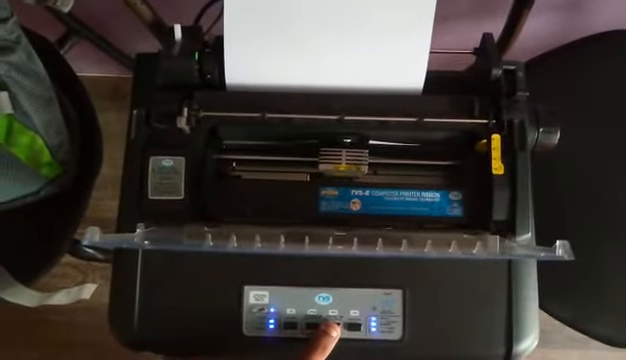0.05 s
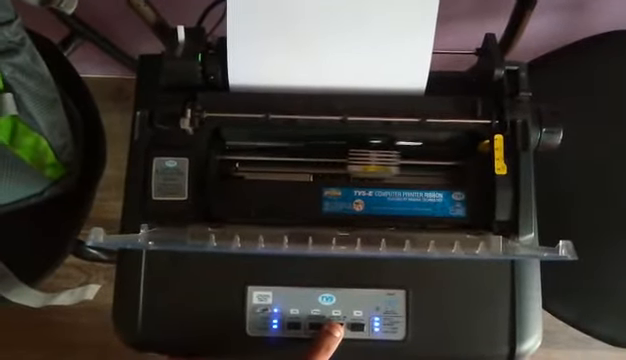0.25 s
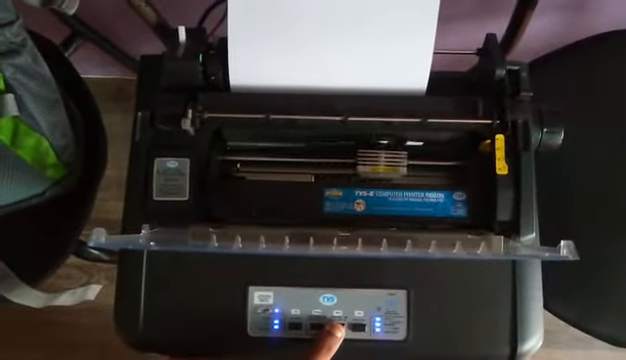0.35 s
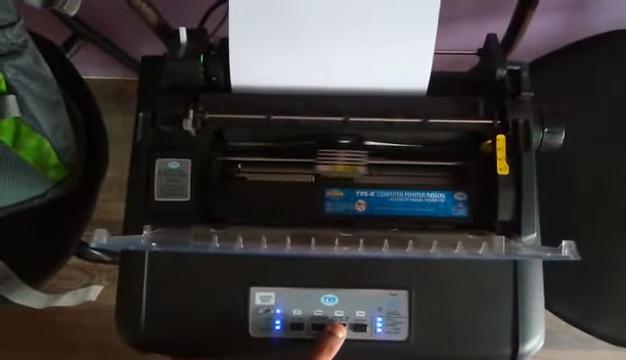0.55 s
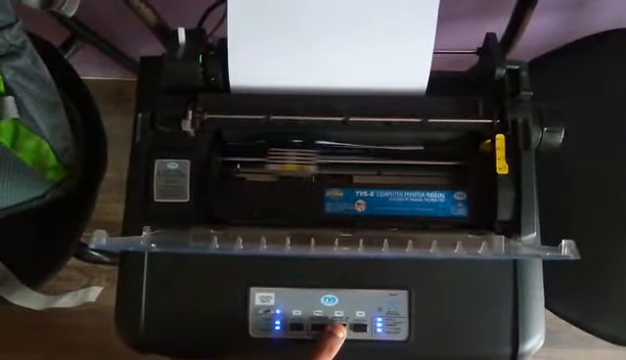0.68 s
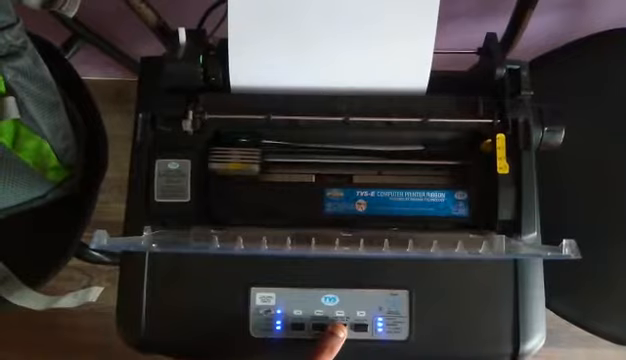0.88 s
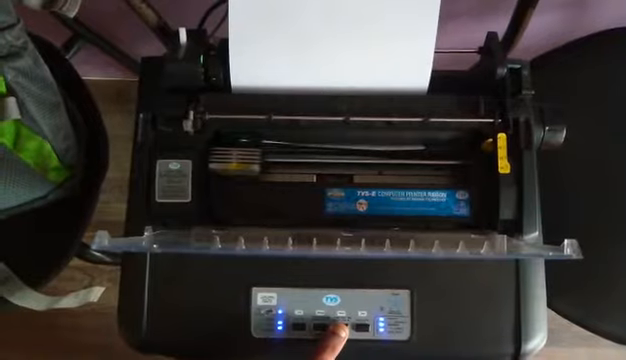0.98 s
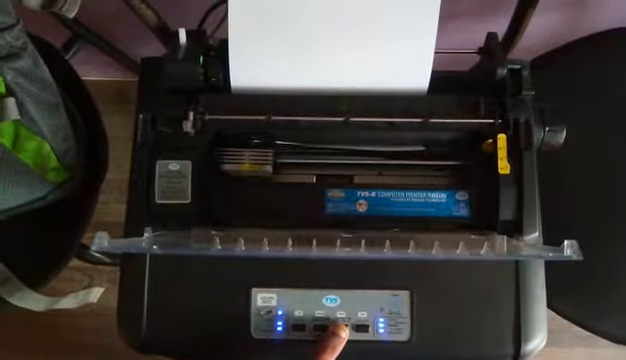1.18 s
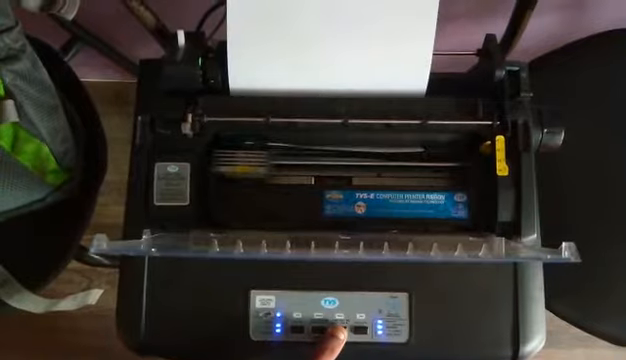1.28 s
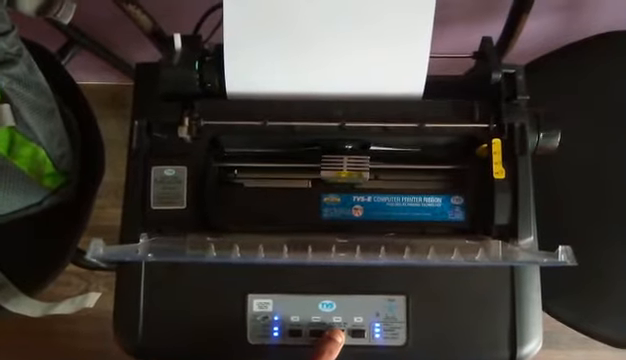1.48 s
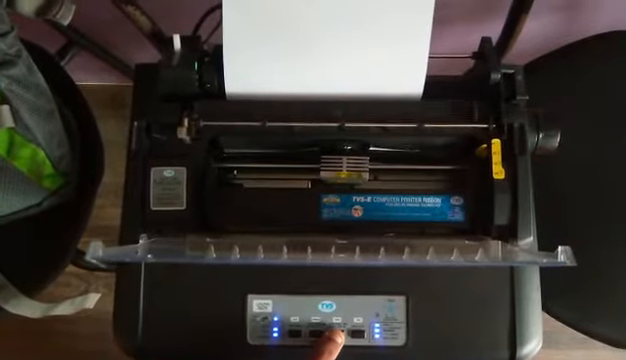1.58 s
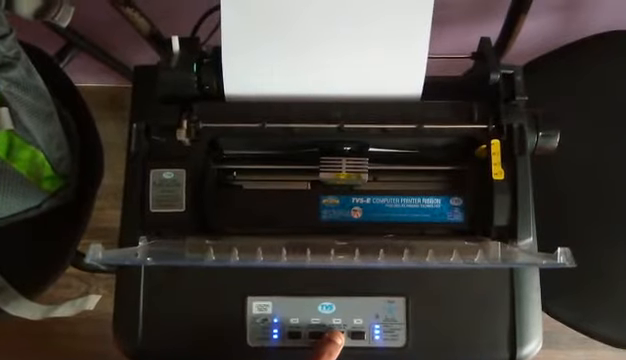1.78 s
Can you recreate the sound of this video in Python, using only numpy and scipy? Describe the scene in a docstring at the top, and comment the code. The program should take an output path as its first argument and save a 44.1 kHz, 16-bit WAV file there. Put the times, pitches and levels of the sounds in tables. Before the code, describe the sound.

Dot matrix printer carriage whining and rattling in quick bursts, knocking at starts and stops.

```python
"""A small quiet room: a dot matrix printer, heard from just above, homes its carriage.
A stepper motor makes four runs. It whines at its step rate and shakes the casing while speeding up
and braking; the carriage hisses along its rail. The frame hums in the first run, the drive squeals
in the last. Slack parts knock at starts and stops, a catch ticks, a soft shuffle ends it."""
import sys
import numpy as np
from scipy import signal
from scipy.fft import rfft, irfft
from scipy.io import wavfile

SR = 44100
rng = np.random.default_rng(int(sys.argv[2]) if len(sys.argv) > 2 else 0)


def persist_wave(psi):
    """Save psi, clipped to +-1, as 16-bit WAV."""
    counts = np.round(np.clip(psi, -1, 1) * 32767).astype(np.int16)
    wavfile.write(sys.argv[1], SR, np.atleast_2d(counts).T)


N = 81585

# Spectrum of shaking parts. Each row: frequency in Hz, level in dB.
JUDDER_SPECTRUM = [(200, -16.5), (500, -4), (850, -13), (1300, 1), (2000, -1.5), (2600, -4.5), (3400, -0.5),
                   (6200, -10.5), (10500, -1), (12000, -48), (15000, -95)]


def undb(db):
    return 10 ** (np.asarray(db) / 20)


def clock():
    return np.arange(N) / SR


def unit(x):
    return x / np.sqrt(np.mean(x ** 2) + 1e-18)


def shape(x, points, tilt_db=0):
    """Filter by (Hz, dB) points and a tilt per octave about 5 kHz, held below 625 Hz."""
    hz, db = np.array(points, float).T
    log_hz = np.log2(np.maximum(np.fft.rfftfreq(2 * N, 1 / SR), 1))
    octaves = np.maximum(log_hz - np.log2(5000), -3)
    gain = undb(np.interp(log_hz, np.log2(hz), db) + tilt_db * octaves)
    return irfft(rfft(x, 2 * N) * gain)[..., :N]


def walk(rate_hz):
    """Smooth random curve, unit RMS."""
    points = rng.standard_normal(N // 8)
    return unit(np.interp(clock() * rate_hz, np.arange(len(points)), points))


def noise(spectrum, tilt_db=0, grain=0):
    """Coloured stereo noise, unit RMS; grain makes it a mass of uneven tiny contacts."""
    contact_size = np.exp(grain * walk(1500))
    return unit(shape(rng.standard_normal((2, N)) * contact_size, spectrum, tilt_db))


def gate(start_s, stop_s, edge_s):
    """On from start to stop, with linear edges."""
    t = clock()
    return np.clip(np.minimum(t - start_s, stop_s - t) / edge_s, 0, 1)


def convolve(x, response):
    return signal.fftconvolve(x, response, axes=-1)[:, :N]


def spread(x, width):
    """Filter side against mid: the microphone pair hears diffuse bass in opposite phase."""
    mid = (x[0] + x[1]) / 2
    side = shape((x[0] - x[1]) / 2, width)
    return np.array([mid + side, mid - side])


def air():
    """Quiet, steady room noise, wide in the bass."""
    # Each row: frequency in Hz, level in dB.
    spectrum = [(15, -72), (25, -27), (86, -6), (128, -7), (224, -17.5), (309, -5.5), (415, -15),
                (515, -7.5), (637, -11), (749, -5), (927, -11.5), (1060, -15), (1180, -11.5), (1280, -12.5),
                (1720, -14.5), (2180, -21), (2430, -22.5), (3090, -25), (5010, -33.5), (6370, -34),
                (7890, -37), (10300, -14.5), (15000, -60)]
    # Each row: frequency in Hz, side gain in dB.
    width = [(30, 9), (80, 12), (160, 15.5), (310, 11.5), (450, 10.5), (750, 1.5), (1300, -4.5),
             (2500, -0.5), (5000, 1), (15000, -0.5)]
    return spread(undb(-48) * noise(spectrum), width)


def room(x):
    """Dense reflections of a small room; the treble dies first."""
    low_t60_s, treble_t60_s, onset_s = 0.51, 0.3, 0.004
    t = clock()
    wash = rng.standard_normal((2, N))
    low = signal.sosfilt(signal.butter(2, 2500, fs=SR, output="sos"), wash)
    tail = low * undb(-60 * t / low_t60_s) + (wash - low) * undb(-60 * t / treble_t60_s)
    response = unit(tail * np.minimum(t / onset_s, 1)) / np.sqrt(N)
    return undb(-8) * convolve(x, response)


def casing(x):
    """Casing modes rung by x, each reaching the two ears in its own phase."""
    # Each row: frequency in Hz, level in dB, T60 in seconds.
    modes = [(533, -2, .25), (705, -3, .2), (1058, -2, .2), (1200, 0, .25), (1376, -2, .2), (1610, -7, .1),
             (2090, -9, .1), (9443, -9, .12), (9980, -10, .12), (10142, -8, .12), (10522, -10, .12),
             (10664, -10, .12)]
    t = clock()
    response = sum(undb(db - 60 * t / t60_s) * np.sin(2 * np.pi * (hz * t + rng.random((2, 1))))
                   for hz, db, t60_s in modes)
    return undb(-51) * convolve(x, response)


def frame_hum():
    """A low frame mode during the first run, in near opposite phase at the ears."""
    # Each row: time in seconds, level in dB.
    contour = [(.215, -62), (.25, -42.5), (.315, -35), (.39, -47), (.48, -43.5), (.53, -59)]
    times_s, db = np.array(contour).T
    mode_hz, ear_phase_rad = 106.4, np.array([[2.6], [0]])
    cycles = np.cumsum(mode_hz * (1 + 0.018 * walk(49.5))) / SR
    envelope = gate(times_s[0], times_s[-1], 0.01) * undb(np.interp(clock(), times_s, db))
    return envelope * np.sqrt(2) * np.sin(2 * np.pi * cycles + ear_phase_rad)


def shuffle():
    """The mechanism settles with a short, soft scrape."""
    # Each row: frequency in Hz, level in dB.
    spectrum = [(250, -20), (600, -7), (1400, 2), (3100, 3.5), (4500, -4.5), (6500, -8.5), (8500, -3),
                (10400, 5.5), (12000, -12), (15000, -20)]
    return undb(-42) * gate(1.672, 1.722, edge_s=0.0091) * noise(spectrum, grain=0.15)


def chatter():
    """Slack parts tremble on briefly after a stop."""
    # Each row: start in seconds, level in dB, decay in seconds.
    bursts = [(0.37, -43, 0.052), (1.191, -44, 0.014), (1.564, -32, 0.027)]
    envelope = 0
    for start_s, db, decay_s in bursts:
        age_s = np.maximum(clock() - start_s, 0)
        envelope += undb(db) * gate(start_s, N / SR, 0.016) * np.exp(-age_s / decay_s)
    return envelope * undb(0.84 * walk(120)) * noise(JUDDER_SPECTRUM, tilt_db=-2.5, grain=0.35)


def catch():
    """A small metal part pings once as the carriage leaves its end stop."""
    # Each row: frequency in Hz, level in dB, T60 in seconds.
    modes = [(5130, -4, 0.016), (5490, 0, 0.018), (6700, -28, 0.027), (9900, -7, .015), (10720, 3, 0.014)]
    start_s, rise_s, ear_phase_rad = 1.0948, 0.0016, np.array([[0], [np.pi / 2]])
    age_s = np.maximum(clock() - start_s, 0)
    ping = sum(undb(db - 60 * age_s / t60_s) * np.sin(2 * np.pi * hz * age_s + ear_phase_rad)
               for hz, db, t60_s in modes)
    return undb(-17.5) * np.minimum(age_s / rise_s, 1) * ping


def squeal():
    """The drive squeals, wavering, at top speed in the fastest run."""
    # Each row: time in seconds, pitch in Hz, level in dB.
    contour = [(1.42, 3330, -55), (1.436, 3350, -36), (1.452, 3475, -39), (1.468, 3426, -36.5),
               (1.478, 3390, -37), (1.49, 3420, -39), (1.5, 3390, -57)]
    times_s, hz, db = np.array(contour).T
    t = clock()
    ear_phase_rad = np.array([[0], [1.2]])
    cycles = np.cumsum(np.interp(t, times_s, hz) * (1 + 0.0059 * walk(270))) / SR
    envelope = gate(times_s[0], times_s[-1], 0.004) * undb(np.interp(t, times_s, db))
    return envelope * np.sin(2 * np.pi * cycles + ear_phase_rad)


def knocks():
    """Slack parts knock: tight clusters of contacts, too light to give bass."""
    # Each row: start in seconds, level in dB, decay in seconds, tilt in dB per octave.
    hits = [(0.2087, -29, 0.0048, -2), (0.4764, -21.5, 0.0098, -2.5), (0.4828, -29, 0.0074, -5.5),
            (0.491, -37, .003, -21), (0.5223, -22.5, 0.007, -1.5), (0.9486, -26, 0.0066, -3),
            (0.984, -33.5, 0.0058, -7), (0.991, -25, 0.011, -2), (1.0962, -33, 0.003, -1.5),
            (1.185, -32.5, 0.0057, -5), (1.292, -31.5, 0.012, -6), (1.2963, -24.5, 0.0058, -2.5),
            (1.3084, -18, 0.0025, -1), (1.33, -21, 0.0033, 1), (1.3422, -19.5, 0.0066, -2.5),
            (1.35, -12.5, 0.005, -2), (1.3654, -27, 0.0083, -6.5), (1.369, -17, 0.0042, -0.5),
            (1.485, -27, .004, 14), (1.5183, -20.5, 0.006, -2), (1.5499, -18, 0.0063, 0)]
    # Each row: frequency in Hz, level in dB.
    spectrum = [(120, -21), (220, -16), (330, -19.5), (550, -4), (900, -4.5), (1350, 2.5), (1700, 1.5),
                (2150, 0), (2650, 1), (3400, 3.5), (5200, 5.5), (6200, 2.5), (8200, 4), (9400, 7.5),
                (10600, 12.5), (11800, -2), (15000, -13)]
    rise_s = 0.0015
    out = 0
    for start_s, db, decay_s, tilt_db in hits:
        age_s = np.maximum(clock() - start_s, 0)
        envelope = np.minimum(age_s / rise_s, 1) * np.exp(-np.maximum(age_s - rise_s, 0) / decay_s)
        out += undb(db) * envelope * noise(spectrum, tilt_db)
    return signal.sosfilt(signal.butter(4, 310, "high", fs=SR, output="sos"), out)


def stepper_whine(steps, harmonics_db):
    """Multiples of the step rate, each with a slow waver and a fast flutter."""
    out = 0
    for k, db in enumerate(harmonics_db, 1):
        waver_db = 2.15 * np.array([walk(24.8), walk(25.84)])
        flutter = 1 + 0.035 * k * walk(200)
        out += undb(db + waver_db) * flutter * np.sqrt(2) * np.sin(2 * np.pi * k * steps)
    return out


def stepper_growl(steps, ramp, running):
    """Rough tone of the slow, uneven steps in the lower 45% of a ramp."""
    envelope = running * np.sqrt(np.clip((0.45 - ramp) * 3, 0, 1)) * undb(1.5 * walk(200))
    tone = np.sin(2 * np.pi * steps) + 1.7 * np.sin(4 * np.pi * steps)
    return undb(-47) * shape(envelope * tone, [(500, 3.5), (1100, -10), (1700, -25), (2600, -14)])


def carriage():
    """Runs ramp up, cruise and brake: whine and rail hiss grow with speed, judder fades."""
    # Each row: start, stop, speed-up and braking in seconds, step rate in Hz, pull-in share of that
    # rate, hiss in dB, hiss tilt in dB per octave, belt roll, judder and rumble in dB,
    # whine swell in dB per second, lag between ears in ms.
    runs = [(0.209, 0.378, .036, .048, 903.6, 0.7, -39.5, -0.5, -46, -37, -55, -5, 0.09),
            (.477, 1.01, .06, .055, 1086, .8, -39, 3, -48, -34, -63, 5, 0.067),
            (1.106, 1.191, 0.037, .04, 811.6, 0.76, -42.5, -5.5, -44, -36, -51, 7, 0.07),
            (1.291, 1.557, .10, .043, 2694, .4, -32.5, 0, -50, -33.5, -49, -40, -0.078)]
    # Each row: one run's levels of step-rate multiples 1 to 6 in dB.
    whine_db = [(-52.5, -36, -53.5, -45, -76, -58), (-42.5, -44.5, -57.5, -50, -66, -72),
                (-66, -45.5, -71, -56, -60, -75), (-43, -68, -68, -77, -79, -92)]
    # Three spectra. Each row: frequency in Hz, level in dB.
    rail_spectrum = [(1200, -25.5), (2700, -16), (3200, -6), (3750, -7.5), (4500, -6), (5200, -6.5),
                     (6100, -12.5), (8000, -6), (9400, -1.5), (10100, 2.5), (10700, 4.5), (11300, -9.5),
                     (12200, -16), (13300, -30), (15000, -38)]
    belt_spectrum = [(120, -4), (220, -14), (320, -21), (550, -25), (800, 1.5), (1300, 7), (1750, -0.5),
                     (2100, 4), (2700, -5), (5000, -8)]
    rumble_spectrum = [(30, -31), (60, -1), (85, 9.5), (106, 21), (135, -12.5), (220, -16), (320, -15.5),
                       (600, -74)]
    ramp_ease, whine_floor, hiss_floor = 1.7, 0.083, 0.17
    t = clock()
    motor = clatter = rumble = 0
    for run, harmonics_db in zip(runs, whine_db):
        (start_s, stop_s, speed_up_s, brake_s, step_hz, pull_in,
         hiss_db, tilt_db, roll_db, judder_db, rumble_db, swell_db_per_s, lag_ms) = run
        running = gate(start_s, stop_s, 0.0025)
        ramp = np.clip(np.minimum((t - start_s) / speed_up_s, (stop_s - t) / brake_s), 0, 1)
        speed = 1 - (1 - pull_in) * (1 - ramp) ** ramp_ease
        hunting = (0.003 + 0.09 * (1 - ramp)) * walk(260)  # rotor speed scatter
        steps = np.cumsum(step_hz * speed * (1 + hunting)) / SR
        ear_steps = steps - step_hz * lag_ms / 1000 * np.array([[0], [1]])

        swell = undb(swell_db_per_s * (t - (start_s + stop_s) / 2))
        whine_gain = running * (whine_floor + (1 - whine_floor) * ramp) * swell
        motor += whine_gain * stepper_whine(ear_steps, harmonics_db)
        motor += stepper_growl(ear_steps, ramp, running)

        hiss_gain = undb(hiss_db + 0.9 * walk(39.9)) * (hiss_floor + (1 - hiss_floor) * ramp)
        hiss = hiss_gain * noise(rail_spectrum, tilt_db, grain=0.18)
        judder = undb(judder_db) * (1 - ramp ** 2.57) * noise(JUDDER_SPECTRUM, grain=0.22)
        roll = undb(roll_db) * noise(belt_spectrum)
        step_pulse = 1 + 0.19 * np.cos(2 * np.pi * steps)
        clatter += running * step_pulse * (hiss + judder + roll)
        rumble += undb(rumble_db) * gate(start_s, stop_s + 0.093, 0.15) * noise(rumble_spectrum)
    return motor, clatter, rumble


def scene():
    """The mechanism rings the casing and the room, over quiet air."""
    # Each row: frequency in Hz, side gain in dB.
    width = [(30, -13), (80, 3), (160, 22.5), (230, 26.5), (400, 11), (750, 10.5), (1300, 0.5), (2200, 2),
             (4000, -1.5), (15000, 0.5)]
    motor, clatter, rumble = carriage()
    body = clatter + knocks() + chatter() + shuffle()
    body += casing(body)
    tones = motor + squeal()
    tick = catch()
    background = air() + frame_hum()
    reflections = room(body + 0.75 * tick + 0.22 * tones)
    return background + tones + tick + spread(body + rumble + reflections, width)


def record(dry):
    """Two microphones, each slightly coloured; the top is cut."""
    # Each row: frequency in Hz, left over right in dB.
    balance = [(80, 5.5), (200, -1), (1200, 0.5), (3000, -1), (6000, 0.5), (10000, -3), (14000, -5)]
    top_hz = 15150
    left = shape(dry[0], [(hz, db / 2) for hz, db in balance])
    right = shape(dry[1], [(hz, -db / 2) for hz, db in balance])
    return signal.sosfilt(signal.ellip(8, 0.2, 70, top_hz, fs=SR, output="sos"), np.array([left, right]))


dry = scene()
out = record(dry)
persist_wave(out)
```